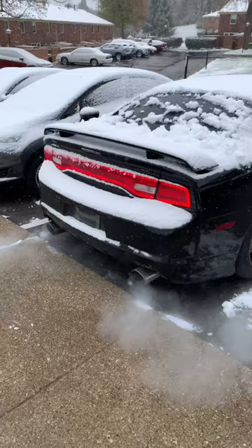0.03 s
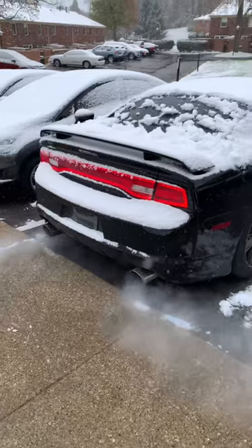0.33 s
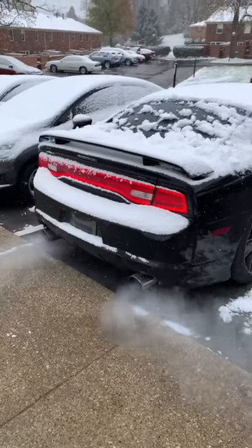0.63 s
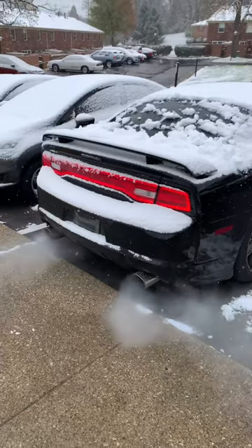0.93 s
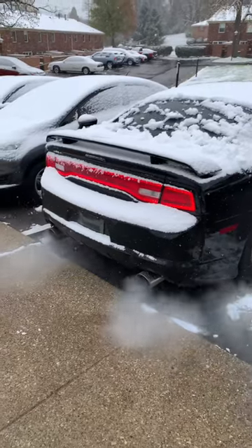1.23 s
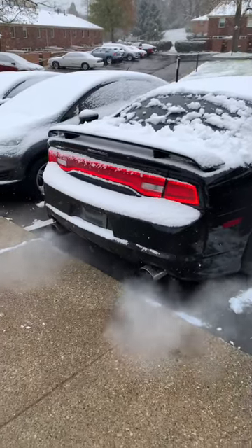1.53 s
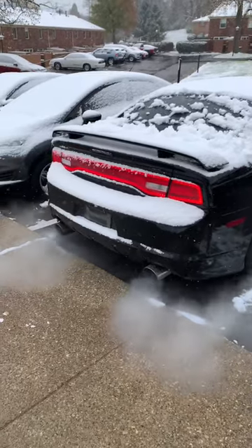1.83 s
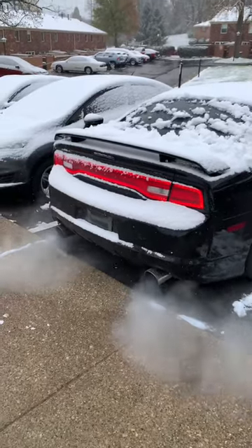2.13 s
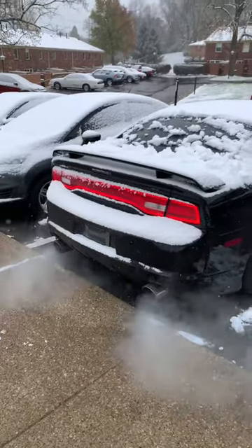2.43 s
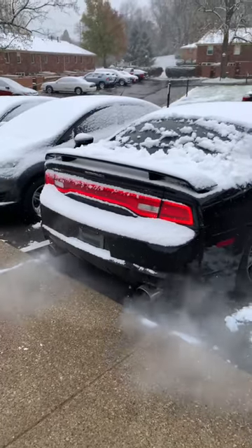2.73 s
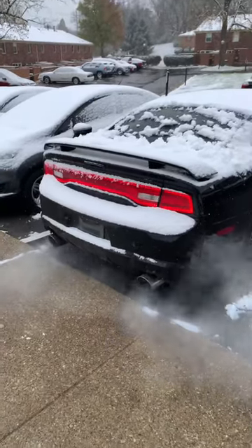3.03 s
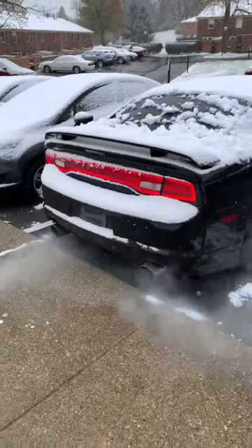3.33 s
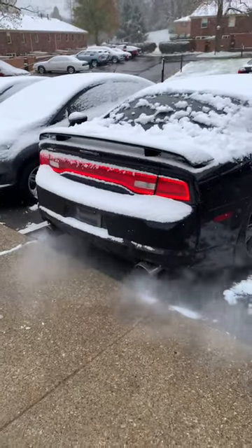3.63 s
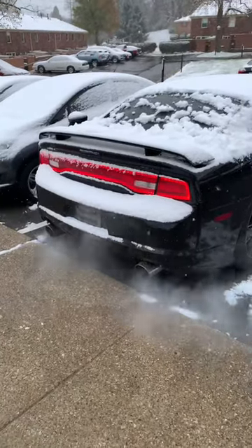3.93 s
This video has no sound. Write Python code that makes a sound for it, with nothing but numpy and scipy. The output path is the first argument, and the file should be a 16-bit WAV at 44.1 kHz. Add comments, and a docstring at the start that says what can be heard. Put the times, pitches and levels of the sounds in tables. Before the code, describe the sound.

A V8 car engine idles with a low, lumpy rumble and sputtering exhaust pops.

```python
"""Deep thumps and a spitting pop open the sound: a V8 idles in an open car park, a few metres away.
It lopes, surging and sagging in a round of 24 firings that keeps repeating. Each firing thumps the
exhaust so that it rings, and pushes a puff of rasping gas from the two tailpipes; the hardest ones pop.
Under this a low drone throbs and a boom and a growl swell, while water drops plop and crackle in the gas.
The gas noise also bounces off the ground and the parked cars."""
import sys
import numpy as np
from scipy import signal
from scipy.fft import rfft, irfft, next_fast_len
from scipy.io import wavfile

SR = 44100
rng = np.random.default_rng(int(sys.argv[2]) if len(sys.argv) > 2 else 0)


def digitize_waveform(pressure):
    """Quantize a signal to 16-bit integers and store it at the path in sys.argv[1].

    Rows of a 2-D input are taken as channels; values are limited to [-1, 1].
    """
    field = np.atleast_2d(pressure).T
    bounded = np.clip(field, -1, 1)
    quanta = np.round(bounded * 32767).astype(np.int16)
    wavfile.write(sys.argv[1], SR, quanta)


N = 176400
TIME = np.arange(N) / SR
HZ = np.fft.rfftfreq(16384, 1 / SR)  # the frequencies at which filters are drawn

# Levels in the tables are relative: each layer's overall loudness is set later.
# when each round of the lope starts: t/s
ROUND_STARTS = [-0.39, 0.23, 0.68, 1.1448, 1.6, 2, 2.5, 3, 3.5, 4, 6]
# the 24 firings of a round (three engine cycles): puff level/dB, thump level/dB
FIRINGS = [(-20, -5.5), (-21, -5.5), (-4, -2.5), (-9, -1), (-15, -2.5), (-11.5, 0.5), (-11.5, -0.5),
           (-15, 0.5), (-14, -1.5), (-20, -3.5), (-10, -1.5), (-14, -2.5), (-27, -5), (-10.5, -1.5),
           (-7, -3.5), (-12, -1.5), (-10, -1), (-8, 1), (-9.5, 1.5), (-12, 0.5), (-22, -2), (-20, -7),
           (-16, -5), (-19, -5.5)]
# which row (bank) of cylinders fires, in firing order: 0 near, 1 far
FAR_BANK = [0, 1, 1, 0, 1, 0, 0, 1]
# how hard the engine thumps as time passes: t/s, level/dB
EFFORT = [(0, -1.9), (0.7, -1), (1.0, 0), (2.0, 0.5), (2.8, 1.8), (3.4, 1.3), (4.0, 0)]
# the notes at which the exhaust rings: f/Hz, width/Hz, level/dB
EXHAUST_NOTES = [(59, 12.7, -5), (97.2, 20, -4), (117.7, 27.8, -2), (149.1, 26, 2), (188.4, 19.9, -2.5),
                 (224.8, 30.5, -6), (253.6, 19.6, -5), (292, 26, -16), (329.3, 24.3, -15), (439, 64, -22.5),
                 (520, 45, -21)]
# rise and fall of the drone: t/s, level/dB
DRONE_LEVEL = [(0.04, -14), (0.38, -20), (0.57, -12), (0.68, -30), (0.76, -11.5), (0.89, -16.5),
               (1.03, -10.5), (1.08, -15.5), (1.36, -13.5), (1.4, -22), (1.46, -11), (1.65, -16.5),
               (1.68, -11), (1.84, -14.5), (1.86, -27), (1.94, -11.5), (2.12, -16.5), (2.16, -10),
               (2.38, -20.5), (2.41, -10.5), (2.59, -14), (2.62, -10.5), (2.77, -18), (2.87, -11),
               (3.06, -16), (3.09, -9.5), (3.23, -21), (3.33, -10.5), (3.5, -16.5), (3.52, -10.5),
               (3.9, -15), (4.0, -24)]
# swells of the boom near 100 Hz: t/s, length/s, level/dB, f/Hz
BOOMS = [(0.036, 0.07, -13, 105.7), (0.138, 0.052, -11.5, 95.4), (0.204, 0.13, -11.5, 100),
         (0.383, 0.05, -11.5, 95.9), (0.454, 0.055, -13.5, 111.7), (0.594, 0.066, -13.5, 103.3),
         (0.668, 0.078, -12, 105.8), (0.918, 0.077, -12, 104), (1.059, 0.042, -15.5, 103.8),
         (1.111, 0.11, -12, 98), (1.311, 0.063, -12, 95.6), (1.378, 0.075, -11, 98.14),
         (1.578, 0.07, -13.5, 95.8), (1.644, 0.035, -17, 95.6), (1.779, 0.045, -12.5, 95.6),
         (1.841, 0.086, -13, 101), (2.045, 0.052, -12, 92.9), (2.114, 0.037, -15, 95.6),
         (2.212, 0.089, -14, 99.95), (2.306, 0.082, -10.5, 99.4), (2.507, 0.11, -12.5, 98.03),
         (2.677, 0.033, -12.5, 101), (2.714, 0.041, -15.5, 106), (2.761, 0.11, -13, 101),
         (2.973, 0.13, -12.5, 100.8), (3.162, 0.13, -11, 99.2), (3.371, 0.032, -17, 104),
         (3.424, 0.046, -12.5, 95.6), (3.49, 0.039, -12, 97.9), (3.681, 0.141, -11, 101),
         (3.825, 0.18, -11.5, 101.1)]
# swells of the throaty growl above it: t/s, length/s, level/dB, f/Hz
GROWLS = [(0.041, 0.1, -20.5, 222.8), (0.459, 0.038, -22.5, 229), (0.542, 0.066, -21, 224.6),
          (0.946, 0.034, -25.5, 240), (1.007, 0.069, -16, 244.6), (1.443, 0.032, -17, 245),
          (1.698, 0.038, -21, 244.9), (1.786, 0.076, -23, 218.1), (1.878, 0.1, -18, 235),
          (2.145, 0.05, -21.5, 236.1), (2.216, 0.024, -19.5, 229.3), (2.283, 0.036, -21.5, 250.6),
          (2.375, 0.07, -19.5, 238), (2.574, 0.097, -21, 221.8), (2.679, 0.025, -19, 228.7),
          (2.795, 0.034, -20.5, 222.4), (2.852, 0.054, -21.5, 232.4), (3.027, 0.18, -20.5, 231),
          (3.53, 0.158, -19.5, 247.8), (3.781, 0.095, -19.5, 239), (3.947, 0.065, -20.5, 250.3)]
# firings that pop and spit: t/s, pop level/dB, spray level/dB
POPS = [(0.0385, -13, -31), (0.0752, -16, -35), (0.1166, -18, -35.5), (0.1795, -25, -40.5),
        (0.2017, -22.5, -38.5), (0.2227, -23.5, -47), (0.2386, -23, -39.5), (0.2594, -21.5, -40),
        (0.2747, -23, -48), (0.3722, -18.5, -32.5), (0.3928, -23, -38), (0.433, -22, -41),
        (0.4534, -15.5, -35), (0.4882, -17.5, -41), (0.5213, -18, -31.5), (0.5414, -18, -31),
        (0.6466, -22, -35.5), (0.6703, -19.5, -39), (0.7046, -19, -39), (0.7384, -16, -39),
        (0.857, -24, -34.5), (0.9035, -27.5, -37), (0.9429, -20.5, -37), (0.9592, -17, -32),
        (0.9782, -11, -29.5), (1.0024, -17.5, -30), (1.11, -18.5, -34), (1.1523, -23, -42.5),
        (1.1742, -21.5, -43), (1.1912, -19, -38.5), (1.2064, -21.5, -41), (1.2256, -16.5, -41.5),
        (1.3035, -16.5, -32), (1.3234, -22.5, -31.5), (1.3673, -19.5, -38), (1.4202, -19, -36.5),
        (1.4417, -15, -29.5), (1.4722, -17.5, -35.5), (1.5722, -15.5, -38.5), (1.614, -20.5, -45),
        (1.6529, -16, -43), (1.6705, -15, -37), (1.6874, -15.5, -33.5), (1.7651, -16, -43),
        (1.7861, -15, -35), (1.8279, -19.5, -39.5), (1.8721, -20.5, -36), (1.8884, -17.5, -33.5),
        (1.9095, -16, -34), (1.9224, -17.5, -38), (1.9402, -12.5, -30.5), (2.0403, -21, -36.5),
        (2.0884, -20.5, -40), (2.1048, -24, -38.5), (2.1258, -21, -39), (2.141, -16, -37),
        (2.1591, -15.5, -29), (2.1949, -13.5, -29.5), (2.2333, -19, -46), (2.2525, -20.5, -38),
        (2.2953, -16.5, -33), (2.3376, -18, -37), (2.371, -16.5, -33.5), (2.4054, -16.5, -33),
        (2.5062, -14, -32), (2.5635, -20, -35), (2.581, -20.5, -38.5), (2.599, -16, -30),
        (2.6184, -15.5, -30), (2.6504, -17, -34), (2.754, -24.5, -42), (2.798, -27, -38),
        (2.8176, -19.5, -42), (2.8365, -17, -28), (2.8707, -18, -29.5), (2.968, -15, -30.5),
        (3.009, -18.5, -40), (3.0295, -17, -37), (3.048, -15.5, -40), (3.0654, -16.5, -32),
        (3.0833, -14.5, -27.5), (3.155, -18.5, -28), (3.1755, -19.5, -31), (3.2166, -15.5, -36),
        (3.2544, -21, -44.5), (3.272, -18, -38), (3.29, -14, -30), (3.3039, -15, -37), (3.3229, -15, -34),
        (3.4845, -20.5, -39), (3.5074, -19, -37.5), (3.5224, -18, -36.5), (3.5414, -17.5, -28),
        (3.5742, -11, -31.5), (3.6735, -13, -34), (3.7354, -18, -41), (3.7539, -14.5, -27.5),
        (3.772, -13.5, -37.5), (3.8822, -12.5, -32.5), (3.9258, -17, -38), (3.9429, -19, -39.5),
        (3.9626, -20.5, -38.5), (3.9814, -12.5, -29.5)]
# narrow notes of the tailpipes, which colour the gas noise: f/Hz, width/Hz, boost/dB
TAILPIPE_NOTES = [(518, 14, 4), (746, 67, 6.5), (956, 40, 6.5), (1060, 60, 2), (1338, 45, 7.5),
                  (1565, 56, 4.5), (1820, 78, 2.5), (1940, 90, 7), (2050, 34, 1), (2380, 140, 6.5),
                  (2717, 65, 1), (3250, 50, 3)]
# bands of the rasp that flare separately: f/Hz, how steeply it follows the flow, share of spray (0-1)
RASP_BANDS = [(574, 0.61, 0.5), (1512, 0.97, 0.08), (2010, 1.09, 0.07), (2696, 1.13, 0.23),
              (3680, 0.96, 0.56), (5100, 0.98, 0.8), (7000, 0.93, 0.85), (11800, 1.14, 0.6)]
# tone colour of the rasping gas: f/Hz, level/dB
RASP_COLOUR = [(100, -27), (300, -13.5), (500, -5.5), (700, -9), (950, -4), (1080, -7), (1180, -16.5),
               (1400, -6), (1600, -3), (2000, -3), (2250, -8.5), (2500, -4), (3000, -10), (3500, -12),
               (4500, -12.5), (5300, -14), (6800, -18), (8600, -20.5), (9300, -24.5), (9900, -41),
               (10800, -21.5), (12000, -24), (13300, -28.5), (14200, -44)]
# tone colour of the duller chuff under it: f/Hz, level/dB
CHUFF_COLOUR = [(30, -5), (120, 2), (250, 4.5), (360, -1), (440, 2), (520, 2), (640, -2), (740, -9.5),
                (950, -3.5), (1200, -14), (1700, -11), (2600, -18.5), (4000, -32), (14000, -43)]
# tone colour of the bursting droplets: f/Hz, level/dB
CRACKLE_COLOUR = [(1500, -32), (2800, -16), (3600, 2.5), (5000, -2), (7000, -1), (8800, -5), (9900, -15),
                  (11000, -7), (13000, -10), (14200, -23)]
# how much louder the left side is than the right: f/Hz, level/dB
LEFT_LOUDER = [(60, 0.5), (91, 0.83), (140, 1.9), (210, 5), (320, 6.5), (480, 1), (730, 0.5), (1110, 0.5),
               (1680, 0), (2550, 4), (3860, -4), (5860, -1), (8880, 1), (13500, 0.0)]
# how far the wave on the left runs ahead of the right: f/Hz, phase/rad
LEFT_LEAD = [(30, 0), (150, 0.08), (280, 0.47), (420, -1.6), (620, -0.9), (850, -.5), (1130, -1.1),
             (1300, -1.5), (1750, -0.33), (1980, 0.35), (2300, -0.4), (2750, 1.9), (3100, -1.8),
             (3700, -2.5), (4400, -4.5), (5000, -3), (6370, -1.2), (7600, 0), (9040, 2.5), (10300, 3.4),
             (11800, 6.5), (13600, 7.5)]


def amp(db):
    """Turns decibels into a factor to multiply by."""
    return 10 ** (np.asarray(db) / 20)


def unit(x):
    """Scales a signal so that its average strength (rms) is 1."""
    return x / np.sqrt(np.mean(x ** 2) + 1e-20)


def look_up(points, hz):
    """Reads between the rows of a frequency table, with octaves evenly spaced."""
    f, value = np.transpose(points)
    return np.interp(np.log(hz + 1), np.log(f), value)


def wander(rate_hz):
    """A smooth random wobble of strength 1, mostly slower than rate_hz."""
    hz = np.fft.rfftfreq(N, 1 / SR)
    return unit(irfft(rfft(rng.standard_normal(N)) / (1 + (hz / rate_hz) ** 4), N))


def colour(x, gain):
    """Filters x with one gain for each frequency in HZ; the filter rings after a sound, never before."""
    log_gain = np.log(np.maximum(np.r_[gain, gain[-2:0:-1]], 1e-5))
    response = np.fft.ifft(np.exp(np.conj(signal.hilbert(log_gain)))).real
    return signal.fftconvolve(x, response[:len(HZ)])[:N]


def firing_times():
    """The time of every firing, and its slot in the round."""
    count = np.arange((len(ROUND_STARTS) - 1) * len(FIRINGS))
    at = np.interp(count / len(FIRINGS), np.arange(len(ROUND_STARTS)), ROUND_STARTS)
    return at, count % len(FIRINGS)


def thumps(far_late_s=0.0031, far_db=-1.5, jitter_s=0.0019, spread_db=2.5):
    """Each firing's kick of pressure makes the exhaust ring; the far bank arrives later and weaker."""
    at, slot = firing_times()
    late, size = rng.standard_normal((len(at), 2)).T
    far = np.array(FAR_BANK)[slot % len(FAR_BANK)]
    at = at + far * far_late_s + late * jitter_s
    gain = amp(np.array(FIRINGS)[slot, 1] + far * far_db + size * spread_db)
    heard = (at > 0) & (at < TIME[-1])
    kicks = np.bincount((at[heard] * SR).astype(int), gain[heard], N)
    t = TIME[:len(HZ)]
    ringing = np.zeros(len(t))
    for k, (hz, width, db) in enumerate(EXHAUST_NOTES):
        fade = width * np.exp(-np.pi * width * t)  # wider notes die sooner
        ringing += (-1) ** k * amp(db) * fade * np.cos(2 * np.pi * hz * t)
    effort = amp(np.interp(TIME, *np.transpose(EFFORT)))
    return effort * amp(-18) * unit(signal.fftconvolve(kicks, ringing)[:N])


def drone(cycles_per_round=28):
    """The exhaust's lowest note never stops ringing; it keeps step with the lope, throbbing twice a round."""
    rounds = np.interp(TIME, ROUND_STARTS, np.arange(len(ROUND_STARTS)))
    throb = 1 + 0.095 * np.cos(2 * np.pi * 2 * (rounds - 0.27))
    tone = np.sin(2 * np.pi * cycles_per_round * rounds + 0.16 * wander(rate_hz=5))
    level = amp(np.interp(TIME, *np.transpose(DRONE_LEVEL)))
    return level * unit(throb * tone)


def pipe_swells(table, rest_db, edge_s, waver_rad):
    """A run of firings falls in step with a pipe's note, which swells and is pulled to the run's pitch."""
    level = np.full(N, amp(rest_db))
    for start, length, db, _ in table:
        inside_s = np.minimum(TIME - start, start + length - TIME)
        level = np.maximum(level, amp(db) * np.clip(0.5 + inside_s / edge_s, 0, 1))
    starts, lengths, _, pitches = np.transpose(table)
    cycles = np.cumsum(np.interp(TIME, starts + lengths / 2, pitches)) / SR
    return level * unit(np.sin(2 * np.pi * cycles + waver_rad * wander(rate_hz=20)))


def gas_flow(pop_db, steady_db, rise_s, fall_s, hold_s=0.003, jitter_s=0.0015, soft_db=-8):
    """How strongly the pipes blow: each firing adds a soft puff or a pop to a steady flow."""
    at, slot = firing_times()
    late, size = rng.standard_normal((len(at), 2)).T
    puff_at = at + late * jitter_s
    puff_db = np.array(FIRINGS)[slot, 0] + soft_db + 0.5 * size
    pop_at = np.array(POPS)[:, 0]
    soft = abs(at[:, None] - pop_at).min(axis=1) > 0.0074  # firings with no pop close by
    starts = np.r_[puff_at[soft], pop_at - 0.003]  # a pop starts just before its peak
    levels = np.r_[puff_db[soft], pop_db]
    power = np.full(N, amp(steady_db) ** 2)
    for start, db in zip(starts, levels):
        span = slice(*np.searchsorted(TIME, [start, start + 0.1]))
        t = TIME[span] - start
        rise = np.minimum(t / rise_s, 1)
        fall = np.exp(-np.maximum(t - rise_s - hold_s, 0) / fall_s)
        power[span] += (amp(db) * rise * fall) ** 2
    return np.sqrt(power)


def tailpipes(flow, spray, sputter_db=1.4, flare_db=2.0):
    """Gas swirls at the pipe mouths: a sputtering rasp, a wet hiss above it and a duller chuff below."""
    boost_db = sum(db / (1 + (2 * (HZ - hz) / width) ** 2) for hz, width, db in TAILPIPE_NOTES)
    rasp_gain = amp(look_up(RASP_COLOUR, HZ) + boost_db)
    chuff_gain = amp(look_up(CHUFF_COLOUR, HZ) + boost_db)
    sputter = amp(sputter_db * wander(rate_hz=390))  # shared by all bands
    rasp = np.zeros(N)
    centres, follows, wets = np.transpose(RASP_BANDS)
    for follow, wet, this_band in zip(follows, wets, np.eye(len(centres))):
        band = np.sqrt(look_up(np.c_[centres, this_band], HZ))  # fades into its neighbours
        drive = flow ** (1 - wet) * spray ** wet
        flare = amp(flare_db * wander(rate_hz=53))
        jet = unit(drive ** follow * sputter * flare * rng.standard_normal(N))
        rasp += colour(jet, np.maximum(band, 0.01) * rasp_gain)
    chuff = colour(flow ** 0.67 * rng.standard_normal(N), chuff_gain)
    return amp(-29.5) * unit(rasp) + amp(-32) * unit(chuff)


def plops(flow, per_s=70, low_hz=1396, high_hz=2700, ring_s=0.0015):
    """Drops of condensed water plop in the gas: short rings, louder when the flow is stronger."""
    t = TIME[:1000]
    drops = np.zeros(N)
    pitches = np.geomspace(low_hz, high_hz, 20)
    for hz in pitches:
        hits = flow * (rng.random(N) < per_s / len(pitches) / SR)
        plop = t * np.exp(-t / ring_s) * np.sin(2 * np.pi * hz * t)
        drops += signal.oaconvolve(hits, plop)[:N]
    return amp(-38) * unit(drops)


def crackle(spray, per_s=500, spread_db=2):
    """Fine droplets burst at the rims of the pipes in each gust of spray."""
    size = amp(spread_db * np.minimum(rng.exponential(1, N), 3))
    sign = rng.choice([-1, 1], N)
    hits = rng.random(N) < per_s / SR
    bursts = spray ** 1.44 * size * sign * hits
    return amp(-47.5) * unit(colour(bursts, amp(look_up(CRACKLE_COLOUR, HZ))))


def direct_sound(x):
    """Sound coming straight from the pipes reaches left and right with different timing and strength."""
    size = next_fast_len(N + len(HZ))
    hz = np.fft.rfftfreq(size, 1 / SR)
    left = amp(look_up(LEFT_LOUDER, hz) / 2)
    right = np.exp(-1j * look_up(LEFT_LEAD, hz)) / left
    return irfft(rfft(x, size) * np.array([left, right]), size)[:, :N]


def car_park_echoes(x, per_s=2000, gap_s=0.001, die_away_s=0.11):
    """Quick echoes bounce off the ground and the parked cars, different at each ear."""
    t = TIME[:SR // 3]
    echoes = rng.standard_normal((2, len(t)))
    echoes *= (rng.random(echoes.shape) < per_s / SR) & (t > gap_s)
    echoes *= amp(-60 * t / die_away_s)
    echoes /= np.linalg.norm(echoes, axis=1, keepdims=True)
    return signal.fftconvolve(x[None], echoes, axes=1)[:, :N]


def scene():
    """Mixes the exhaust's thumps and low tones with the gas and spray; only the gas and spray echo."""
    _, pop_db, spray_db = np.transpose(POPS)
    flow = gas_flow(pop_db + 10, steady_db=-24.5, rise_s=0.0027, fall_s=0.013)
    spray = gas_flow(spray_db + 31, steady_db=-23.5, rise_s=0.0033, fall_s=0.012)
    gas = tailpipes(flow, spray) + plops(flow) + crackle(spray)
    boom = amp(-0.5) * pipe_swells(BOOMS, rest_db=-21, edge_s=0.015, waver_rad=0.44)
    growl = amp(-1.05) * pipe_swells(GROWLS, rest_db=-37, edge_s=0.02, waver_rad=0.59)
    engine = thumps() + drone() + boom + growl + gas
    return direct_sound(engine) + amp(-6.5) * car_park_echoes(gas)


def record(dry):
    """Starts the sound abruptly, gently squashes the tallest peaks and cuts the highest treble."""
    start_s, fade_s, ceiling, top_hz = 0.033, 0.0031, 0.95, 14000
    opened = dry * np.clip((TIME - start_s) / fade_s, 0, 1)
    squashed = opened / (1 + (abs(opened) / ceiling) ** 8) ** (1 / 8)
    treble_cut = signal.firwin(255, top_hz, window=("kaiser", 8), fs=SR)
    return signal.oaconvolve(squashed, treble_cut[None], "same")


dry = scene()
out = record(dry)
digitize_waveform(out)
```